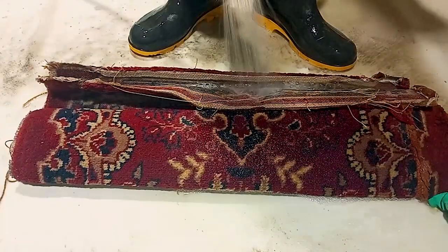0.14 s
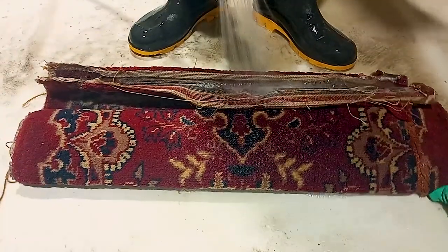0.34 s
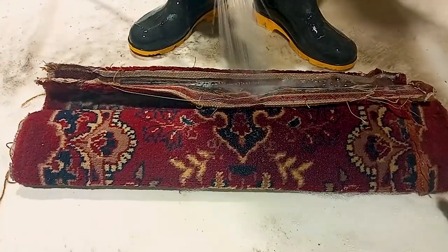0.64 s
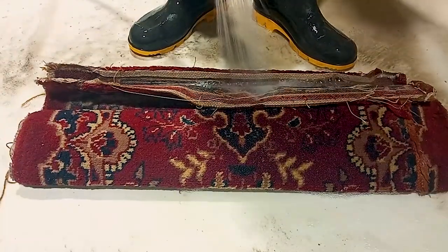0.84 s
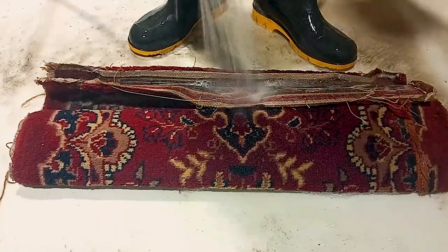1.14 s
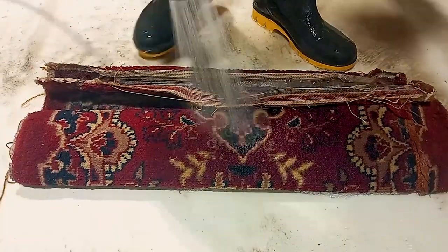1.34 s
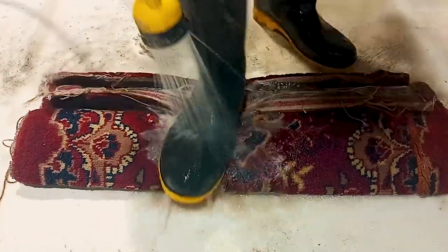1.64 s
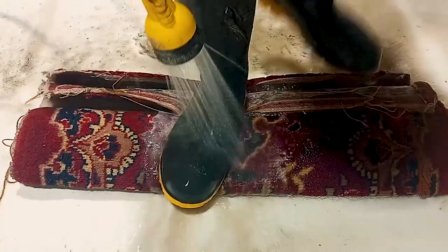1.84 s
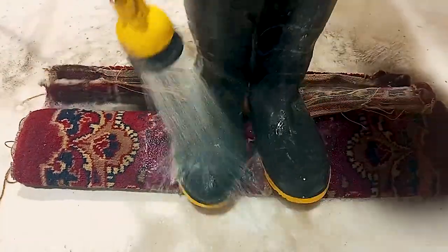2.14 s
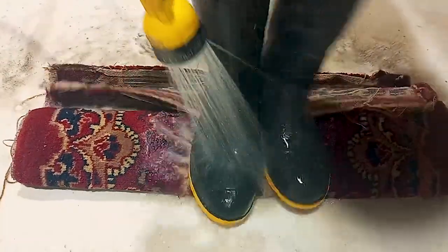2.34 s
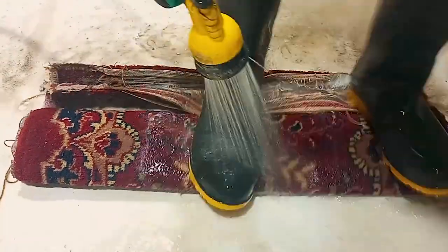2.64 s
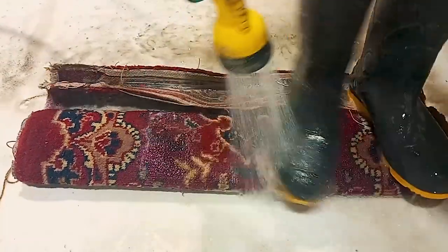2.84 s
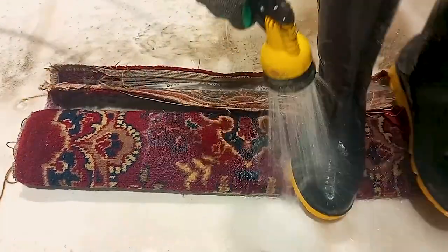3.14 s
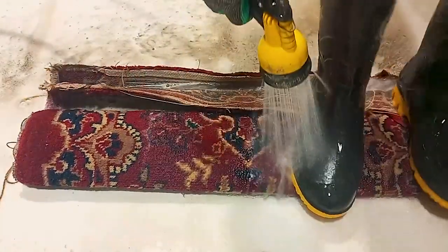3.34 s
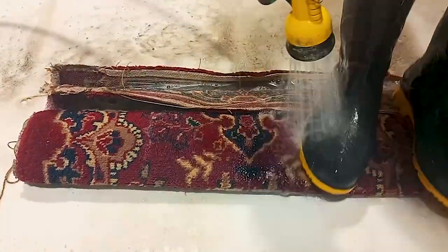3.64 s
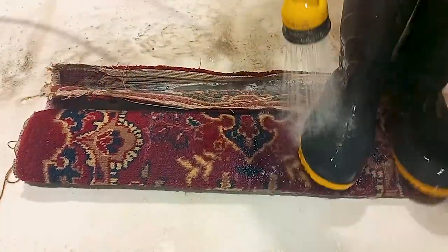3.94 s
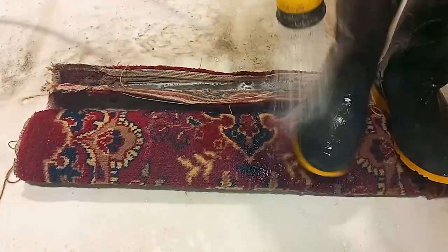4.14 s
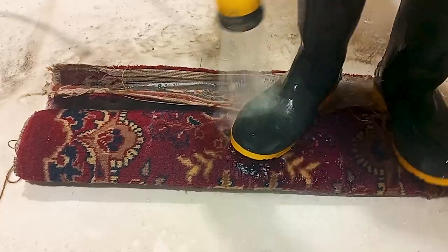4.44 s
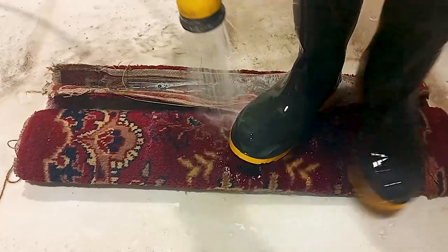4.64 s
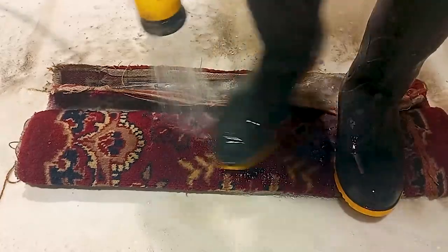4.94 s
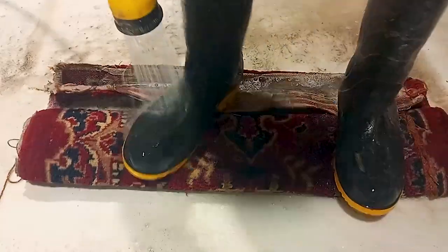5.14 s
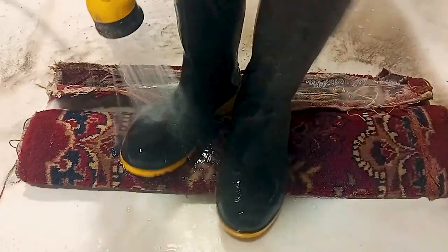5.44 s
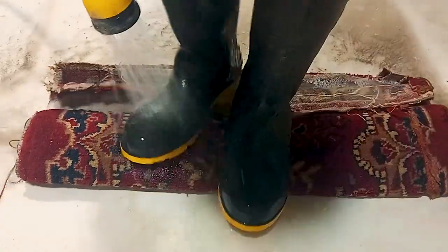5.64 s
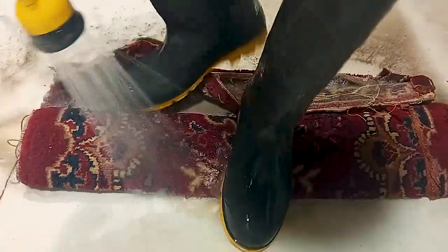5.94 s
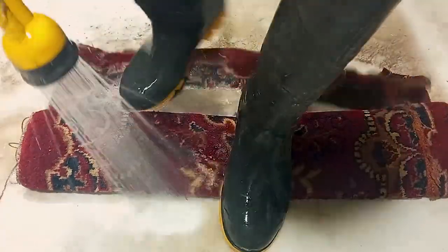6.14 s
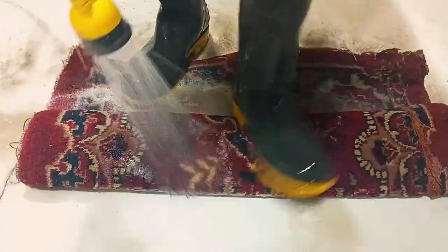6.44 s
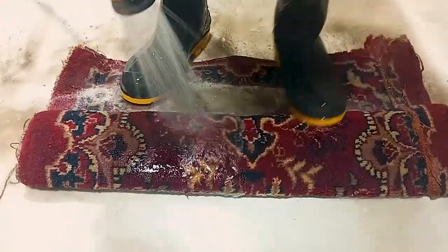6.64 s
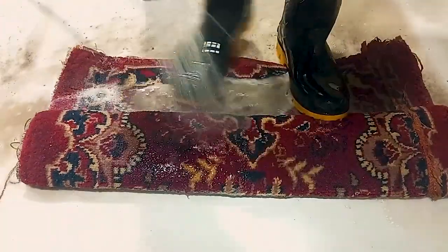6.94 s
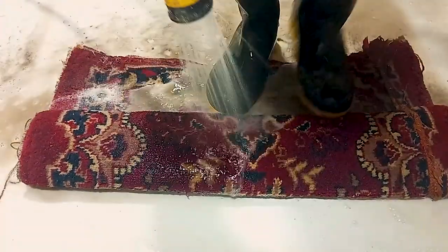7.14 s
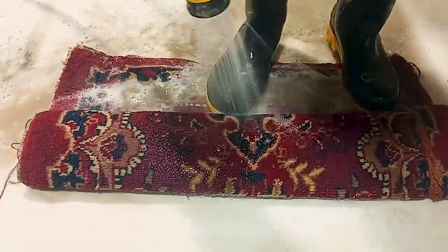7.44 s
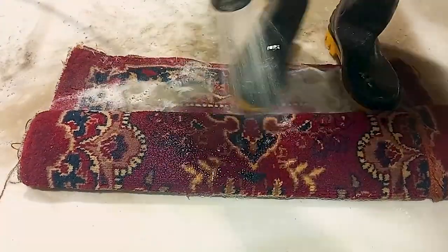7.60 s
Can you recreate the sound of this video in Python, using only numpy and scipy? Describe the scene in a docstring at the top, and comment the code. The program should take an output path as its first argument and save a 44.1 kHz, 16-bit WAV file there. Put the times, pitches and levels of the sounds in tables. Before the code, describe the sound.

Continuous water spray spatters and gurgles on a wet rug as hollow rubber boots step, slap and squelch in a bare, hard room.

```python
"""A hose rose showers a rolled wet rug on a hard floor, heard by one microphone that feeds both channels.
For most of the first second there is only water: jets hiss, drops spatter and fizz as rising sine grains,
water gurgles and sloshes in the pile and drums on hollow boots as filtered noise and grains.
Then rubber boots tread: resonant thuds, smacks as short tones and squelches as noise bands, in a bare room.
The tread eases off after 5.2 s and picks up again at 6.5 s; a smack and a splash come close to the end."""
import sys
import numpy as np
from scipy import signal
from scipy.fft import rfft, irfft, next_fast_len
from scipy.io import wavfile
from scipy.ndimage import uniform_filter1d, map_coordinates

SR = 44100
rng = np.random.default_rng(int(sys.argv[2]) if len(sys.argv) > 2 else 0)


def wrap_up_sound(samples):
    """Save the sound to the file named by the first command line argument, as 16-bit audio."""
    columns = np.atleast_2d(samples).T
    # keep every value between -1 and 1, then stretch to whole-number steps
    tamed = np.clip(columns, -1, 1)
    steps = np.round(tamed * 32767).astype(np.int16)
    wavfile.write(sys.argv[1], SR, steps)


N = 342657

# boots landing: [t/s, peak level/dB, firmness of the heel blow over the soft push/dB]
FOOTFALLS = [(0.948, -29, -5), (1.275, -27, 18), (1.653, -22, 29), (1.678, -21, 28), (2.010, -14.5, 25),
             (2.046, -20, 11), (2.392, -23.5, 7), (2.657, -25, 5), (2.691, -22, 25), (2.706, -18.5, 24),
             (3.011, -23.5, 10), (3.458, -37, 27), (3.592, -26, 25), (3.719, -31, 23), (3.796, -34, 23),
             (4.484, -21, 16), (4.763, -24, 11), (4.796, -26, 22), (4.886, -26.5, 20), (5.116, -35, 25),
             (6.519, -25.5, 16), (6.573, -29.5, 14), (6.804, -23, 38), (6.818, -30, 21), (7.087, -23, 21),
             (7.143, -27.5, 23)]


def amp(db):
    """Decibels to gain."""
    return 10 ** (np.asarray(db) / 20)


def unit(x):
    """Scaled to rms 1."""
    return x / np.sqrt(np.mean(x ** 2) + 1e-20)


def along(points, hz):
    """Reads (f/Hz, value) points on a log frequency axis."""
    f, value = np.transpose(points)
    return np.interp(np.log(hz + 1), np.log(f + 1), value)


def curves(rows):
    """One value per sample for each column after the time."""
    s, *columns = np.transpose(rows)
    return [np.interp(np.arange(N) / SR, s, column) for column in columns]


def wobble(rate):
    """A smooth random curve, rate knots a second."""
    knots = rng.standard_normal(int(N * rate / SR) + 4)
    return map_coordinates(knots, [np.arange(N) * rate / SR])


def filtered(x, response):
    """x times a complex response of frequency, padded so that tails do not wrap round."""
    m = next_fast_len(x.shape[-1] + 8192)
    spectrum = rfft(x, m) * response(np.fft.rfftfreq(m, 1 / SR))
    return irfft(spectrum, m)[..., :x.shape[-1]]


def resonance(f, hz, width_hz):
    """One causal resonance, gain 1 at its centre."""
    return 1j * f * width_hz / (hz * hz - f * f + 1j * f * width_hz)


def add(track, s, sound):
    """Mixes a sound in at s seconds."""
    part = track[round(s * SR):][:len(sound)]
    part += sound[:len(part)]


def swells(events, rise_s, fall_s):
    """The power of short swells, one for each (t/s, level/dB) row."""
    out, t = np.zeros(N), np.arange(SR // 2) / SR
    for s, db, *_ in events:
        add(out, s, amp(2 * db) * (1 - np.exp(-t / rise_s)) * np.exp(-t / fall_s))
    return out


def patchy_noise(patchy_db):
    """Noise whose gain drifts in patches of time and frequency."""
    z = signal.stft(rng.standard_normal(N + 512), nperseg=512)[2]
    across_bins = uniform_filter1d(rng.standard_normal(z.shape), size=6, axis=0)
    patches = uniform_filter1d(across_bins, size=12, axis=1)
    noise = signal.istft(z * amp(patchy_db * unit(patches)), nperseg=512)[1]
    return unit(noise[:N])


def drops(count, centre_hz, octaves, cycles, spread_db):
    """Small bubbles at random moments: damped sines that rise in pitch as they surface."""
    u = rng.random((count, 2))
    pitch = centre_hz * 2 ** (octaves * rng.standard_normal((count, 1)))
    hz = np.clip(pitch, centre_hz / 3, SR / 3)
    k = np.arange(int(6 * cycles * SR / centre_hz))
    age = k * hz / SR / cycles  # in decay times
    turns = cycles * age * (1 + 0.0724 * age)
    size = np.minimum(-np.log(1 - u[:, 1:]), 3)  # loud bubbles are rare, and the loudest are held to a limit
    envelope = np.exp(-age) * (1 - np.exp(-6 * age))
    grains = amp(spread_db * size) * envelope * np.sin(2 * np.pi * turns)
    at = (u[:, :1] * N).astype(int) + k
    return unit(np.bincount(at.ravel(), grains.ravel(), N + len(k))[:N])


def water(spectrum, grains, share, patchy_db):
    """Countable drops over a dense rush of finer ones, in one colour, rms 1; share is the drops' power."""
    mix = np.sqrt(share) * grains + np.sqrt(1 - share) * patchy_noise(patchy_db)
    return unit(filtered(mix, lambda hz: amp(along(spectrum, hz))))


def room(x):
    """A bare room's answer: each frequency of a noise tail dies at its own speed."""
    # decay of the room: [f/Hz, time to fall 60 dB/s]
    decay = [(150, 0.57), (1000, 0.4), (5000, 0.21), (14000, 0.085)]
    hz, t, z = signal.stft(rng.standard_normal(SR // 2), SR, nperseg=256)
    tail = signal.istft(z * amp(-60 * t / along(decay, hz)[:, None]), SR, nperseg=256)[1]
    late = np.pad(x, (400, 0))  # the answer starts 9 ms after the sound
    return signal.fftconvolve(late, tail / np.linalg.norm(tail))[:N]


def near_walls(x, echo_db):
    """Early echoes comb the sound into fine bands; the pattern changes as the stream moves to a new spot."""
    out, hop, t = np.zeros(N), SR // 3, np.arange(SR // 10) / SR
    for start in range(-hop, N, hop):  # a new pattern every third of a second, crossfaded
        first = max(start, 0)
        window = np.sqrt(np.hanning(2 * hop))[max(-start, 0):]
        piece = x[first:start + 2 * hop]
        faded = piece * window[:len(piece)] ** 1.745
        echoes = rng.standard_normal(len(t)) * amp(-60 * t / 0.099) * (t > .002)
        path = amp(echo_db) * echoes / np.linalg.norm(echoes)
        path[0] = 1  # the direct sound
        add(out, first / SR, signal.fftconvolve(faded, path / np.linalg.norm(path)))
    return out


def shower():
    """Jets leave the rose and burst on the rug; the flow flutters in all bands together."""
    # the shower as it swings about, before flutter: [t/s, jet hiss level/dB, spatter level/dB]
    swing = [(0.0, -31, -32.5), (0.3, -33.5, -33), (0.82, -33, -33.5), (1.34, -32.5, -36.5),
             (1.86, -33.5, -39.5), (2.29, -32, -35), (2.94, -31.5, -34), (3.18, -31.5, -36),
             (3.42, -31.5, -36), (3.94, -31, -35.5), (4.26, -33, -39), (4.8, -32, -37), (5.04, -35, -37),
             (5.22, -36, -39.5), (5.82, -34, -39), (6.14, -33, -36.5), (7.44, -33, -35.5), (7.77, -34, -37)]
    # the stream bursts bright on hard rubber or bare floor, dull on soaked pile: [t/s, fizz level/dB]
    burst = [(0, -35.5), (1.0, -34), (1.2, -33.5), (1.33, -37.5), (1.62, -37.5), (1.76, -50), (1.99, -38.5),
             (2.2, -39.5), (2.31, -53), (2.38, -40), (2.92, -37), (2.935, -31), (3.43, -31), (3.55, -38),
             (3.8, -32), (4.1, -34), (4.28, -48), (4.65, -40), (4.74, -38), (4.98, -36), (5.0, -42),
             (5.22, -50), (5.36, -40.5), (5.9, -42.5), (6.1, -34.5), (6.16, -29.5), (6.43, -31),
             (6.48, -38.5), (6.95, -34), (7.06, -40), (7.52, -32), (7.77, -43)]
    # a narrow band sings in the spray, moving with the angle of the rose: [t/s, centre f/Hz, level/dB]
    song = [(0, 3236, -47), (1.24, 3283, -41), (1.32, 3316, -50), (2.3, 2903, -38.5), (2.38, 3100, -49),
            (2.68, 3310, -37), (2.8, 3310, -50), (3.1, 3390, -33.5), (3.2, 3385, -46), (3.35, 3590, -33),
            (3.5, 3506, -51), (3.9, 3350, -37.5), (4.25, 3465, -56), (4.62, 2994, -45), (4.7, 2870, -37),
            (4.8, 3290, -42), (5.6, 3395, -50.5), (5.95, 3323, -36), (6.15, 3200, -39.5),
            (6.44, 3135, -35.5), (6.55, 3400, -46.5), (7.08, 3404, -48), (7.31, 3510, -43),
            (7.77, 3360, -47)]
    # a boot coming down throws up fine spray: [t/s, level before its swell/dB]
    splashes = [(1.655, -36), (2.005, -31.5), (2.05, -38), (2.335, -39), (4.349, -37), (4.47, -34),
                (4.765, -39), (7.088, -38), (7.75, -28)]
    # colours of the three sheets of water: [f/Hz, relative level/dB]
    spatter_colour = [(880, -24), (1500, -12), (1900, -9.5), (2100, -2), (2300, -6), (2680, -5),
                      (3270, -8.5), (4070, -6.5), (4800, -28), (6240, -47), (10600, -120)]
    fizz_colour = [(2120, -18.5), (3600, -4), (4110, -6), (6270, -8.5), (6930, -7.5), (7530, -6),
                   (8000, -10.5), (10400, -29), (17600, -120)]
    jet_colour = [(3820, -18), (6500, -10), (7470, -6.5), (7610, -3), (8000, -6), (9770, -11.5),
                  (10700, -7), (12100, 0.5), (15100, -10.5), (16800, -22)]

    jet_db, spatter_db = curves(swing)
    sing_hz, sing_db = curves(song)
    fizz_db, = curves(burst)
    flow = 0.81 * wobble(14.0) + 2.0 * wobble(70)  # dB, each band takes its share

    spatter_drops = drops(count=12000, centre_hz=2536, octaves=0.408, cycles=3.86, spread_db=2.5)
    spatter = water(spatter_colour, spatter_drops, share=0.088, patchy_db=3.0)
    fizz_drops = drops(count=20000, centre_hz=5560, octaves=0.375, cycles=3.7, spread_db=2.0)
    fizz = water(fizz_colour, fizz_drops, share=0.15, patchy_db=3.2)
    jet_drops = drops(count=30000, centre_hz=11150, octaves=0.46, cycles=0.75, spread_db=2.0)
    jets = water(jet_colour, jet_drops, share=0.28, patchy_db=2.0)
    # slow noise on a gliding carrier is a narrow band that follows the centre
    turn = np.exp(2j * np.pi * np.cumsum(sing_hz) / SR)
    singing = unit(wobble(750) * turn.real + wobble(750) * turn.imag)

    fizz_gain = np.sqrt(amp(2 * fizz_db) + swells(splashes, rise_s=0.002, fall_s=0.068))
    near = amp(spatter_db + 0.41 * flow) * spatter
    near += amp(sing_db + 1.0 * wobble(6.5) + 0.18 * flow) * singing
    near += amp(0.53 * flow) * fizz_gain * fizz
    # the jet hiss takes along a share of the fizz's swings
    jet_swing_db = 0.28 * (fizz_db - fizz_db.mean())
    return near_walls(near, echo_db=-9.0) + amp(jet_db + jet_swing_db + 0.29 * flow) * jets


def soak():
    """Bubbles gurgle in the pile, water sloshes in its folds and drums on the boots; each step adds a surge."""
    # water in the pile, in the folds and on the hollow boots, before surges:
    # [t/s, gurgle level/dB, slosh level/dB, drumming level/dB]
    wetness = [(0.0, -48, -45.5, -47), (0.5, -45, -43.5, -56), (1.45, -40, -48.5, -40.5),
               (2.14, -43, -50, -41.5), (2.62, -42.5, -44, -40.5), (2.92, -42.5, -50, -41.5),
               (3.2, -45.5, -43, -38.5), (4.0, -42, -47, -38.5), (4.26, -45, -53, -44.5),
               (4.74, -43.5, -53, -55), (5.02, -41, -50, -48), (5.3, -45.5, -49, -42),
               (6.17, -41, -56, -48.5), (6.49, -45, -63, -53), (6.82, -43.5, -42, -49),
               (7.36, -45.5, -56, -44.5), (7.77, -45, -44, -40)]
    # colours of the bubbles and of the stream on the boots: [f/Hz, relative level/dB]
    gurgle_colour = [(400, -44), (680, -17.5), (797, -1), (890, -4), (973, 0.5), (1060, -4.5), (1440, -3.5),
                     (1590, -5.5), (1800, 1.5), (2340, -7.5), (3960, -120)]
    drum_colour = [(35, -76), (60, -46), (97, -30), (146, -8), (197, -3), (253, -7.5), (318, -3), (462, -8),
                   (500, -49), (650, -26), (1100, -120)]

    gurgle_db, slosh_db, drum_db = curves(wetness)
    # a step presses water through the pile for a moment
    tread = swells(FOOTFALLS, rise_s=0.0046, fall_s=0.049)

    def surging(steady_db, tread_db):
        """Adds the power of the tread to a steady level."""
        return np.sqrt(amp(2 * steady_db) + amp(2 * tread_db) * tread)

    bubbles = drops(count=2500, centre_hz=1091, octaves=0.415, cycles=3.2, spread_db=2.5)
    gurgle = water(gurgle_colour, bubbles, share=0.069, patchy_db=2.0)
    slosh = unit(filtered(patchy_noise(patchy_db=2.0), lambda hz: resonance(hz, 569, 186) ** 2))
    drumming = unit(filtered(patchy_noise(patchy_db=2.0), lambda hz: amp(along(drum_colour, hz))))
    pile = surging(gurgle_db, -16.5) * gurgle + surging(slosh_db, -28) * slosh
    hollow = surging(drum_db + 1.0 * wobble(10), -14.5) * drumming
    return near_walls(pile, echo_db=-1.0) + near_walls(hollow, echo_db=-4.0)


def squelches():
    """Crackly noise in one band: a fast swell, a hold while the sole sinks, a short tail."""
    # water squeezed out under a sole:
    # [t/s, level/dB rms, centre f/Hz, width of each of two resonances/centre f, hold/s]
    squeezes = [(1.272, -32.5, 890, 3.2, 0.029), (1.651, -37, 4000, 1.2, 0.012),
                (1.665, -24, 4600, 1.5, 0.013), (1.695, -32, 1200, 1.2, 0.017),
                (2.004, -30, 3450, 0.65, 0.026), (2.054, -37, 1520, 1.5, 0.039),
                (2.379, -33, 3000, 3, 0.035), (2.697, -29.5, 2330, 2, 0.032),
                (2.977, -26, 3630, 2.1, 0.013), (4.027, -28.5, 1220, 0.51, 0.017),
                (4.029, -26, 3500, 0.87, 0.017), (4.465, -30, 880, 0.2, 0.02),
                (4.488, -30.5, 1010, 0.22, 0.024), (4.84, -35, 3800, 0.58, 0.043),
                (4.854, -30, 2500, 1.6, 0.041), (5.114, -35, 3100, 0.73, 0.021),
                (5.246, -36.5, 1500, 1.8, 0.03), (6.064, -39, 760, 0.7, 0.032),
                (7.091, -27, 2630, 1.6, 0.011), (7.095, -29.5, 2280, 0.81, 0.12)]
    out, t = np.zeros(N), np.arange(SR // 4) / SR
    for s, db, hz, width, hold in squeezes:
        bursts = unit(uniform_filter1d(rng.standard_normal(len(t)), size=40))
        crackle = rng.standard_normal(len(t)) * amp(3.5 * bursts)
        band = filtered(crackle, lambda f: resonance(f, hz, hz * width) ** 2 / (1 + (f / 8500) ** 6))
        shape = (1 - np.exp(-t / 0.00081)) * np.exp(-np.maximum(t - hold, 0) / 0.008)
        add(out, s, amp(db) * shape * band / np.std(band[t < hold]))
    return out


def smacks(rows, rise_s):
    """Spray cracks out as the sole meets the water; its air pocket pops as a short tone that swells and dies."""
    out, t = np.zeros(N), np.arange(SR // 16) / SR
    for s, db, hz, t60 in rows:
        rise = min(rise_s, 0.3 * t60)
        swell = np.sin(np.pi / 2 * np.minimum(t / rise, 1)) ** 2
        late = np.maximum(t - rise, 0)
        pop = swell * amp(-60 * late / t60) * np.sin(2 * np.pi * hz * t)
        noise = rng.standard_normal(len(t))
        crack = unit(filtered(noise, lambda f: resonance(f, hz, 0.57 * hz) / (1 + (f / 8500) ** 6)))
        # the spray lies under the pop and falls 60 dB in 0.03 s
        smack = pop + amp(-17 - 60 * t / .03) * crack * (1 - np.exp(-t / 0.00037))
        add(out, s, amp(db) * smack / np.abs(smack).max())
    return out


def steps():
    """A heel blow and a crumpling push behind it ring the hollow boot."""
    # resonances of hollow rubber: [f/Hz, width/Hz, level/dB]
    modes = [(159.6, 43, 3), (235.4, 22, 3), (308, 89, -7), (430, 1300, -12.5)]
    out, t = np.zeros(N), np.arange(SR // 4) / SR

    def sole(f):
        """The boot's resonances in alternating sign; a small sole radiates little deep bass."""
        boot = sum((-1) ** k * amp(db) * resonance(f, hz, w) for k, (hz, w, db) in enumerate(modes))
        return boot * (1j * f / (1j * f + 120)) ** 2

    for s, db, firm_db in FOOTFALLS:
        blow = amp(firm_db - 60 * t / 0.0042) * (1 - np.exp(-t / 0.00055))
        push = amp(-60 * t / 0.23) * (1 - np.exp(-t / 0.0034)) * rng.standard_normal(len(t))
        thud = filtered(blow + push, sole)
        add(out, s, amp(db) * thud / np.abs(thud).max())
    return out


def scene():
    """Boots with their echoes over the running water, alike on both channels."""
    # a wet sole smacks and traps a pocket of air: [t/s, peak level/dB, pocket f/Hz, time to fall 60 dB/s]
    wet_soles = [(0.952, -26, 269, 0.099), (1.6684, -23, 4000, .007), (1.676, -12, 4220, 0.0027),
                 (1.6752, -13, 6230, 0.0028), (1.6814, -14, 1439, 0.0031), (1.6847, -18, 3600, 0.005),
                 (1.9544, -25, 5300, .006), (2.0032, -19, 4200, 0.008), (2.0058, -24, 6560, .007),
                 (2.0157, -4, 4750, 0.0029), (2.0497, -17, 1770, .007), (2.0500, -15, 1190, 0.012),
                 (2.0513, -24, 332, 0.03), (2.0492, -26, 6258, .005), (2.1032, -27, 5000, .006),
                 (2.335, -18.5, 3960, .004), (2.351, -19, 3300, 0.0086), (2.3835, -18, 2780, 0.0054),
                 (2.409, -23, 756, 0.012), (2.410, -20, 3620, .003), (2.4205, -20, 4000, .006),
                 (2.7015, -14, 3240, 0.0053), (2.7075, -18, 2100, .01), (2.7107, -18, 230, 0.032),
                 (2.7265, -22, 2180, 0.011), (2.732, -20, 4440, 0.0048), (2.938, -24, 5800, .005),
                 (2.9794, -22, 2980, 0.0053), (2.988, -14.5, 2720, .007), (2.993, -14, 2740, .006),
                 (4.0320, -20, 1250, 0.0095), (4.0385, -16, 3900, 0.0072), (4.859, -19.5, 1820, 0.013),
                 (6.8053, -18, 2000, 0.013), (6.8050, -19, 905, 0.0085), (6.8060, -17.5, 350, 0.032),
                 (6.8210, -15, 2010, 0.013), (7.0838, -10, 2980, .012), (7.0864, -14, 2900, .004),
                 (7.0878, -3, 2600, 0.007), (7.0882, -11, 3600, .005), (7.0876, -14, 1800, .005),
                 (7.1234, -14, 2300, 0.0071), (7.1781, -13, 2010, 0.011), (7.4172, -18, 3000, .003),
                 (7.417, -17, 2054, 0.012), (7.75, -21, 3550, 0.0055), (7.7548, -11, 2640, 0.003)]
    # a sole's edge ticks on the floor, same columns
    edge_ticks = [(2.7268, -14, 4400, .005), (4.3490, -7.5, 4600, .0045), (4.7666, -12, 5500, .004),
                  (4.7669, -17, 3600, .004), (7.0878, -16, 7300, .004)]
    wet = smacks(wet_soles, rise_s=0.00114) + squelches()
    wet += smacks(edge_ticks, rise_s=0.0001)  # almost no swell
    heavy = steps()
    echoes = amp(-13) * room(wet) + amp(-7) * room(heavy)
    mono = shower() + soak() + echoes + wet + heavy
    return np.array([mono, mono])


def record(dry):
    """The deep bass is rolled off and the sound ends at 15.75 kHz."""
    bass_cut = lambda hz: (1j * hz / (1j * hz + 110)) ** 4
    return filtered(filtered(dry, bass_cut), lambda hz: hz < 15750)


dry = scene()
out = record(dry)
wrap_up_sound(out)
```